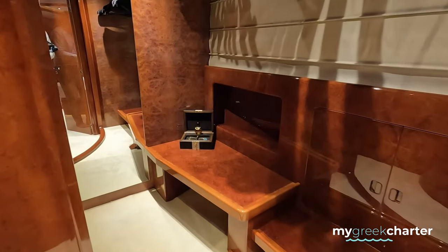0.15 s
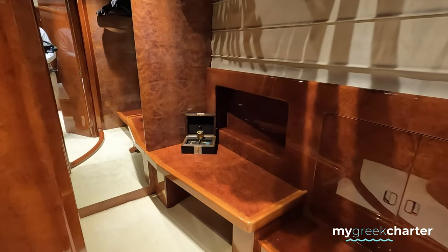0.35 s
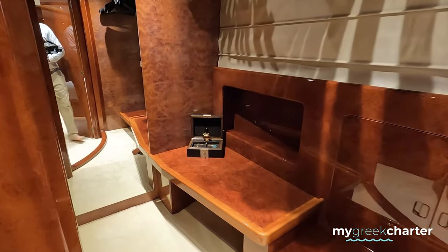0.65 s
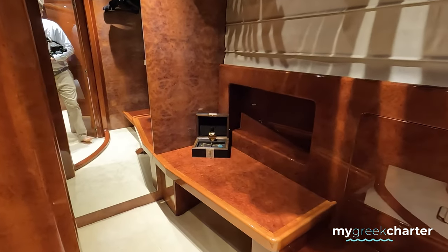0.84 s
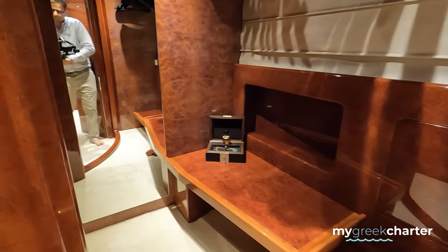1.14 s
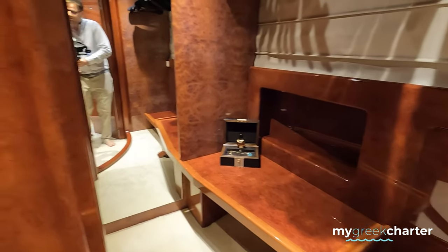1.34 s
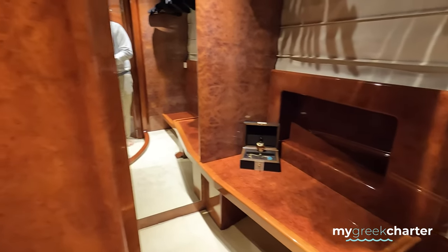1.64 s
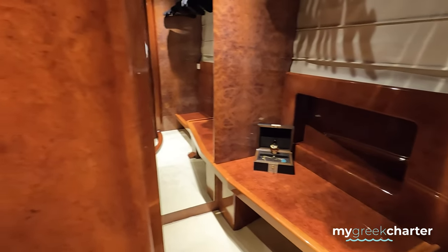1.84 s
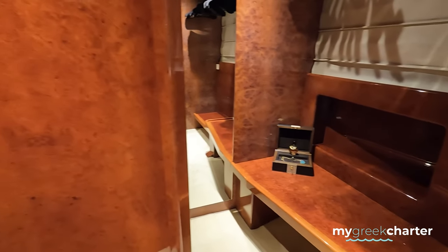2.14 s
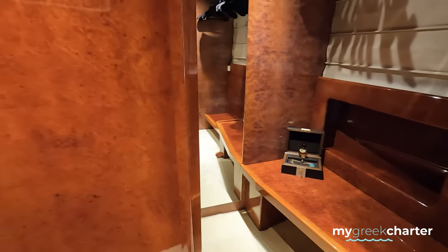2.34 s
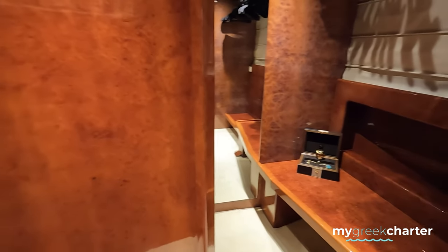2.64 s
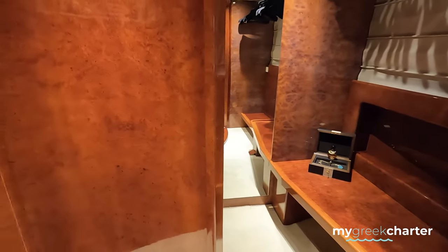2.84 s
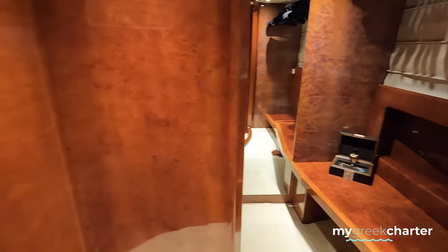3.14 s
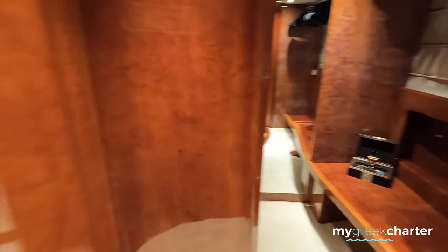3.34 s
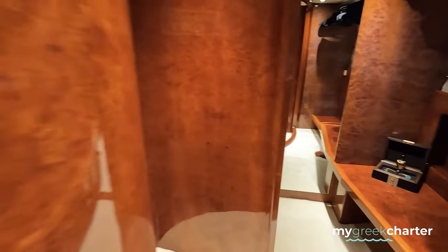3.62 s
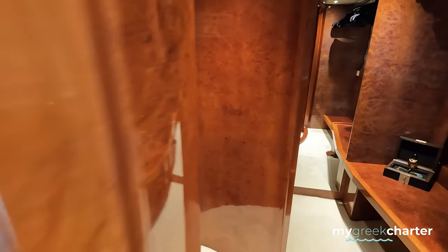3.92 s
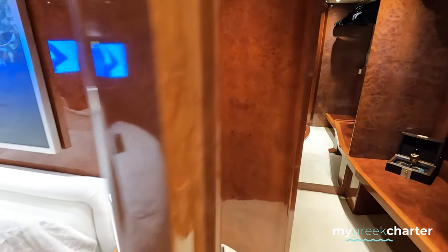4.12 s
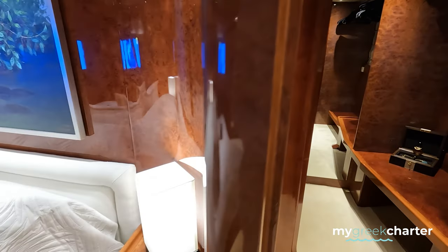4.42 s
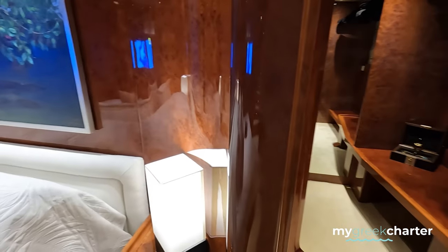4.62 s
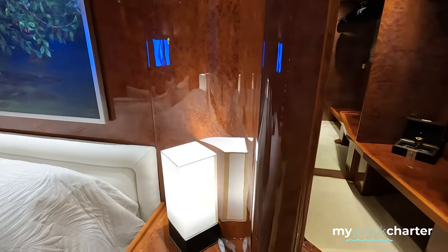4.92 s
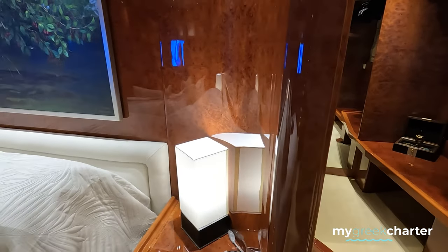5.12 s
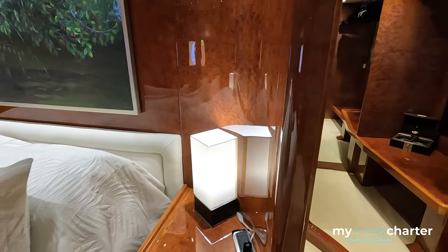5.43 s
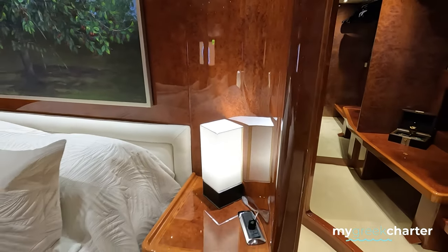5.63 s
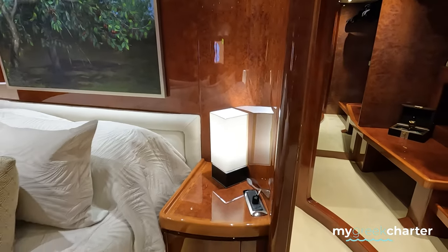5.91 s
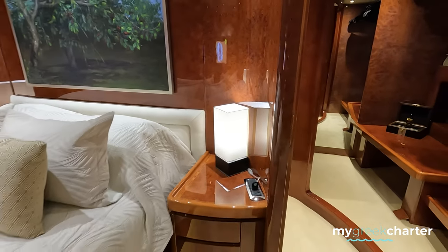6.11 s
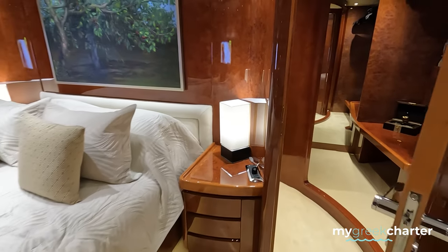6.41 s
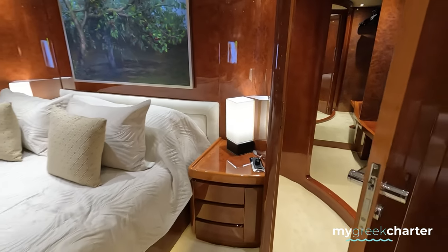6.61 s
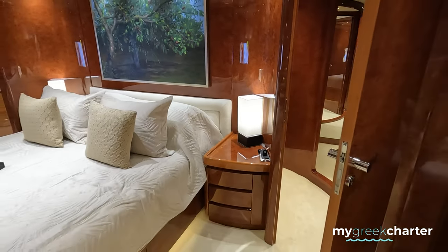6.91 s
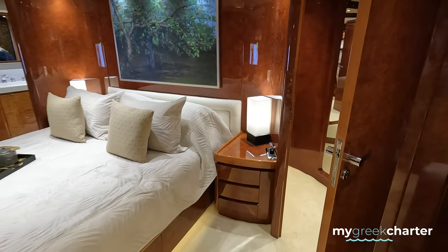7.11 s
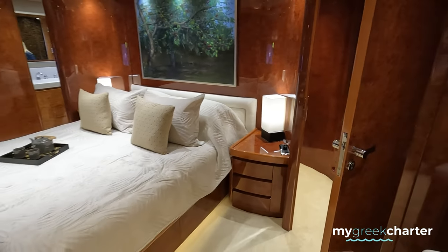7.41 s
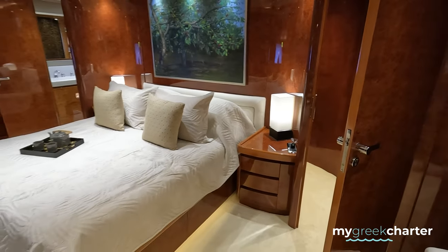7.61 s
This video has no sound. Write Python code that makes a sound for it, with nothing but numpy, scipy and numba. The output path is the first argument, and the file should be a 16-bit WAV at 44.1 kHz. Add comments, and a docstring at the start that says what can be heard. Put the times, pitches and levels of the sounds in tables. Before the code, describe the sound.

Inside a wood-panelled boat cabin, ventilation rushes and a motor hums low while clothes and feet swish softly on carpet. A metal fitting clicks with a light knock on a panel. Later a latch clicks twice in quick succession, each time with a wooden knock. A few lighter knocks follow, then a door bangs shut, ringing the panels. It is all heard close up on a phone carried by someone walking.

```python
"""Inside a wood-panelled boat cabin, heard close up on a phone carried by someone walking about.
From the start ventilation rushes and a motor hums, while cloth and feet swish on carpet. At 1.4 s a
fitting clicks and a panel knocks; near 4.1 s a latch clicks twice, each time with a knock of wood.
After a few lighter knocks a door bangs shut at 6.7 s, ringing the panels, and the phone turns its
gain down."""
import sys
import numpy as np
from scipy import signal
from scipy.fft import rfft, irfft, next_fast_len
from scipy.io import wavfile
from scipy.ndimage import uniform_filter1d
from numba import njit

SR = 44100
rng = np.random.default_rng(int(sys.argv[2]) if len(sys.argv) > 2 else 0)


def output_pcm(signal):
    """Save a mono or channel-first signal as 16-bit PCM at the path in sys.argv[1].

    Samples are clipped to [-1, 1] before scaling.
    """
    pcm = np.clip(np.atleast_2d(signal).T, -1, 1) * 32767
    wavfile.write(sys.argv[1], SR, np.round(pcm).astype(np.int16))


N = 342083
T = np.arange(N) / SR
BANDS_HZ = 500 * 2 ** np.arange(0, 5, .5)  # half-octave noise bands for swishes and clicks


def undb(db):
    """Decibels to gain."""
    return 10 ** (np.asarray(db) / 20)


def unit(x):
    """Scaled to rms 1."""
    return x / np.sqrt(np.mean(x ** 2))


def fader(points):
    """Gain over time through (s, dB) points."""
    return undb(np.interp(T, *np.transpose(points)))


def colour(x, points):
    """Filter by (Hz, dB) points joined on a log axis."""
    size = next_fast_len(len(x))
    hz, db = np.transpose(points)
    f = np.arange(size // 2 + 1) * SR / size + 1
    return irfft(rfft(x, size) * undb(np.interp(np.log(f), np.log(hz), db)), size)[:len(x)]


def noise_band(hz, width_hz):
    """Noise passed twice through one resonance, rms 1."""
    b, a = signal.iirpeak(hz, hz / width_hz, SR)
    return unit(signal.lfilter(b, a, signal.lfilter(b, a, rng.standard_normal(N))))


def waver(rate_hz):
    """Random levels held 1 / rate_hz seconds and smoothed twice."""
    hold = int(SR / rate_hz)
    steps = np.repeat(rng.standard_normal(N // hold + 1), hold)
    return uniform_filter1d(uniform_filter1d(steps, hold), hold)[:N]


def bell(hz, centre_hz, octaves):
    """Gain that falls away from a centre on a log axis."""
    return np.exp(-.5 * (np.log2(hz / centre_hz) / octaves) ** 2)


@njit
def follow(x, attack, release):
    """Envelope that rises fast and falls slowly."""
    level, envelope = 0., np.empty(len(x))
    for i in range(len(x)):
        level += (abs(x[i]) - level) * (attack if abs(x[i]) > level else release)
        envelope[i] = level
    return envelope


# The motor's tones. Each row: frequency in Hz, relative level in dB.
MOTOR_TONES = [(27, -11.5), (53.8, -2.5), (78, -18), (102.3, -2.5)]
# The hum fades as the walker leaves the passage. Each row: time in seconds, level in dB.
MOTOR_LEVEL = [(0, -60.5), (2.1, -64), (2.36, -55.5), (2.75, -62), (3.8, -61.5), (4.05, -66), (5.9, -68.5),
               (7.76, -60.5)]


def motor_hum():
    """A motor in the background: low tones of steady pitch, each wavering in level."""
    hum = np.zeros(N)
    for hz, db in MOTOR_TONES:
        amplitude = np.sqrt(2) * undb(db + 0.98 * waver(rate_hz=3))
        hum += amplitude * np.sin(2 * np.pi * (hz * T + rng.random()))
    return hum * fader(MOTOR_LEVEL)


# Moving air in the cabin. Each row: frequency in Hz, relative spectral density in dB.
AIR_SPECTRUM = [(18, -42), (30, -33.5), (93, -9.5), (130, -13), (207, 0.5), (269, -10), (304, -6.5),
                (389, -2), (427, -7), (506, -4), (791, -12.5), (1200, -47), (1560, -52), (2640, -120)]
# Resonances of the ducts. Each row: frequency in Hz, width in Hz, relative level in dB.
DUCT_RESONANCES = [(205.4, 10.4, -1), (215, 54, -10), (299.9, 21, 4.5), (394.4, 12.7, -3.5), (556, 100, -6),
                   (657, 37, -9.5)]
# The rush is louder with the phone near a vent. Each row: time in seconds, level in dB.
VENT_LEVEL = [(0, -48), (.22, -44), (.6, -48.5), (.74, -43), (.9, -48), (1.7, -47.5), (2.1, -47.5),
              (2.36, -44.5), (2.75, -46.5), (3.7, -46), (3.95, -44), (4.4, -45.5), (5.12, -43.5),
              (5.32, -45), (5.55, -44.5), (6.2, -44.5), (7, -46.5), (7.76, -42.5)]


def ventilation():
    """A broad rush of air, with wavering duct resonances a little below it in level."""
    ducts = sum(undb(db + 0.84 * waver(rate_hz=4.13)) * noise_band(hz, width_hz)
                for hz, width_hz, db in DUCT_RESONANCES)
    air = unit(colour(rng.standard_normal(N), AIR_SPECTRUM)) * undb(0.31 * waver(rate_hz=4.4))
    return unit(air + undb(-3.5) * unit(ducts)) * fader(VENT_LEVEL)


# Steady rustle of clothes, close to the phone. Each row: time in seconds, strongest band's level in dB.
RUSTLE_LEVEL = [(0, -58.5), (.8, -63), (1.35, -58.5), (1.7, -65), (2.4, -62.5), (3.75, -60.5), (4.4, -61),
                (4.7, -60), (5.9, -61.5), (7.76, -58.5)]
# Soles and sleeves brushing. Each row: time of the peak in seconds, band level at the centre in dB,
# centre in Hz, fall time in ms.
BRUSH_STROKES = [(.15, -56, 3000, 21), (.237, -48.5, 1740, 43), (.41, -58, 1770, 83), (.498, -55, 1970, 26),
                 (0.749, -52.5, 1670, 47), (.95, -80, 6000, 39), (1.22, -60, 7000, 95),
                 (1.328, -54.5, 1720, 31), (1.44, -45.5, 2010, 38), (1.573, -58, 3400, 26),
                 (2.13, -57, 1490, 52), (2.351, -57, 1760, 59), (2.883, -54.5, 1840, 57),
                 (3.19, -56.5, 2200, 85), (3.495, -49, 1500, 57), (3.597, -46.5, 1980, 46),
                 (3.875, -48.5, 1980, 26), (4.26, -52, 1500, 27), (4.527, -52.5, 1800, 40),
                 (4.98, -50.5, 2030, 50), (5.43, -60.5, 4100, 77), (5.723, -49, 1700, 49),
                 (6.139, -54, 2090, 27), (6.28, -56, 2480, 20), (6.371, -49, 1840, 32),
                 (6.742, -44, 2980, 21), (6.95, -48, 2220, 51), (7.24, -59, 4100, 40)]


def swishes(bands):
    """Rubbing fibres: a steady rustle, and strokes that swell and stop, each with its own colour."""
    rustle = fader(RUSTLE_LEVEL)
    out = np.zeros(N)
    for hz, noise in zip(BANDS_HZ, bands):
        power = (bell(hz, centre_hz=2000, octaves=2.19) * rustle) ** 2
        for peak_s, peak_db, centre_hz, fall_ms in BRUSH_STROKES:
            near = slice(max(int((peak_s - .4) * SR), 0), int((peak_s + .4) * SR))
            ms = 1000 * (T[near] - peak_s)
            width_ms = fall_ms * np.where(ms < 0, 0.91, 1)  # rises a little faster than it falls
            stroke = np.exp(-(ms / width_ms) ** 2)
            power[near] += stroke * (bell(hz, centre_hz, octaves=0.96) * undb(peak_db)) ** 2
        out += noise * np.sqrt(power) * undb(2.0 * waver(rate_hz=25))
    return out


# Clicks of the latch and fittings. Each row: time in seconds, band level at the centre in dB,
# centre in Hz, width in octaves, echo relative to the click in dB.
METAL_CLICKS = [(1.385, -41.5, 5050, 1.54, -2.5), (1.393, -47.5, 5000, 1.5, -6),
                (2.345, -55, 1500, 1.2, -8), (2.672, -58, 2470, .8, 7), (2.872, -55, 1800, 1.3, -7),
                (4.07, -35, 2300, 1.35, -0.5), (4.164, -32.5, 2070, 1.08, -3.5),
                (5.036, -53, 4000, 1.9, -7), (5.215, -54.5, 1640, .92, -20), (6.721, -46, 2580, 4.1, 4.5),
                (6.774, -47.5, 2600, 1.3, 5.5), (7.433, -51, 2400, 1.3, -9), (7.6182, -51, 1300, 1.3, -6)]
# Resonances of the fittings. Each row: frequency in Hz, width in Hz, gain in dB.
FITTING_RESONANCES = [(838, 140, 4), (1490, 390, -7), (2130, 410, -4.5), (2650, 110, -0.5), (3540, 190, -7),
                      (5300, 340, -9.5)]
CLICK_MS, ECHO_T60_S = 7.6, 0.25  # the echo's decay time holds at 2 kHz


def latch_clicks(bands):
    """A short metal rattle, then the cabin's echo, which fades sooner in the treble; fittings ring."""
    out = np.zeros(N)
    for time_s, peak_db, centre_hz, octaves, echo_db in METAL_CLICKS:
        start = int((time_s - .001) * SR)
        t = T[:min(SR // 2, N - start)]
        span = slice(start, start + len(t))
        for hz, noise in zip(BANDS_HZ, bands):
            rise_s = 0.002 * max(hz / 3000, 1)
            rattle = np.exp(-(1000 * t / CLICK_MS) ** 2) * np.minimum(t / rise_s, 1)
            decay_db = 60 * t / ECHO_T60_S * (hz / 2000) ** 0.12
            echo = undb(echo_db - decay_db) * np.minimum(t / 0.013, 1)
            out[span] += noise[span] * (rattle + echo) * bell(hz, centre_hz, octaves) * undb(peak_db)
    ringing = sum(undb(db) * signal.lfilter(*signal.iirpeak(hz, hz / width_hz, SR), out)
                  for hz, width_hz, db in FITTING_RESONANCES)
    return out + ringing


# Modes of the panelling. Each row: frequency in Hz, relative level in dB, seconds to fall 60 dB at
# a damping factor of 1.
PANEL_MODES = [(58, -19, 0.31), (86, 2.5, 0.24), (97.3, -19, 0.33), (113.9, 6.5, 0.36),
               (138.4, -17.5, 0.38), (146, -1, 0.31), (169.3, -1, 0.45), (197.7, 3.5, 0.23),
               (205, -10, 0.65), (223.4, -4.5, 0.15), (259.8, -1.5, 0.62), (302.6, 3, 0.43), (315, 1, 0.39),
               (339, -8.5, 0.59), (386, -11.5, 0.29), (421, -5, 0.1), (433, -20.5, 0.36),
               (506.6, -7.5, 0.44), (551, -2, 0.77), (628.4, -1, 0.4), (725, -15, 0.59), (685, -1, 0.32),
               (832, 2, 0.079), (945, -30, .25), (1080, 10, 0.12)]
# Small panels push little deep bass into the air. Each row: frequency in Hz, gain in dB.
PANEL_RADIATION = [(20, -29), (60, -3.5), (100, 1.5), (20000, -5.5)]
# Blows on wood around the cabin; the cluster from 6.7 s is the door. Each row: start in seconds, level
# in dB, centre of the modes reached in Hz, reach in octaves, damping factor, free ringing time in ms.
WOOD_BLOWS = [(.655, -52, 543, 0.38, 1.9, 150), (1.428, -39, 95, .4, 2.3, 150),
              (1.437, -29.5, 380, 0.86, 2.16, 150), (2.329, -54, 89, 0.21, 0.73, 250),
              (3.438, -37, 330, 0.15, 2.3, 150), (4.0744, -20.5, 306, 0.52, 2.04, 140),
              (4.1661, -17.5, 300, 0.51, 2.28, 150), (4.509, -35, 112, 1, 3.3, 150),
              (5.138, -44.5, 195, 0.29, 0.51, 140), (5.219, -30.5, 267, 0.52, 3.3, 38),
              (5.855, -37, 121, .6, 6.8, 150), (6.279, -43.5, 147, .32, 1.8, 150),
              (6.716, -16, 247, 0.35, 0.42, 58), (6.7605, -11.5, 505, 0.43, 2.1, 180),
              (6.762, -6, 96, 0.76, 1.5, 250), (6.764, -6.5, 292, 0.41, 1.12, 160),
              (6.815, -19, 354, 0.61, 2.2, 97), (6.855, -20.5, 280, 0.62, 1.57, 74),
              (7.432, -41.5, 303, 1, 1.6, 130)]
PUSH_CYCLES, STOP_MS = 0.78, 23  # time constants: the blow builds up, the panel is stilled
THUMP_DB, THUMP_CYCLES = 6, 0.95
BUZZ_DB, BUZZ_T60_S = -1.5, 0.37  # decay time at a damping factor of 1


def panels_and_door():
    """Each blow pushes briefly and rings the modes near its centre until frame or hand stills the wood."""
    out = np.zeros(N)
    hz, db, t60_s = np.transpose(PANEL_MODES)[:, :, None]
    sign = (-1.) ** np.arange(len(hz))[:, None]  # neighbouring modes move the struck spot opposite ways
    t = T[:SR // 2]
    bins_hz = 2 * np.arange(len(t) // 2 + 1) + 1
    scatter = rng.standard_normal((len(WOOD_BLOWS), len(hz), 2))
    for (start_s, level_db, centre_hz, octaves, damping, free_ms), chance in zip(WOOD_BLOWS, scatter):
        share = undb(db + 1.7 * chance[:, :1]) * bell(hz, centre_hz, octaves)
        detune = 1 + 0.002 * chance[:, 1:]
        modes = sign * np.sin(2 * np.pi * hz * detune * t) * share * undb(-60 * damping * t / t60_s)
        ring = np.sqrt(2 / np.sum(share ** 2)) * modes.sum(axis=0)
        # loose panels buzz against their frames: noise around the same pitch
        spectrum = rfft(rng.standard_normal(len(t))) * bell(bins_hz, centre_hz, 1.26 * octaves)
        buzz = unit(irfft(spectrum, len(t))) * undb(BUZZ_DB - 60 * damping * t / BUZZ_T60_S)
        # the contact itself: a cycle or two at the onset
        cycles = centre_hz * t
        thump = undb(THUMP_DB) * np.sin(2 * np.pi * cycles) * np.exp(-(cycles / THUMP_CYCLES) ** 2)
        push = 1 - np.exp(-cycles / PUSH_CYCLES)  # a softer blow pushes longer and reaches lower modes
        stilled = np.exp(-np.maximum(1000 * t - free_ms, 0) / STOP_MS)
        knock = undb(level_db) * push * stilled * (ring + buzz + thump)
        start = int(start_s * SR)
        out[start:start + len(t)] += knock[:N - start]
    return colour(out, PANEL_RADIATION)


def scene():
    """The cabin as it reaches the phone, one channel."""
    rubbed = [noise_band(hz, 0.68 * hz) for hz in BANDS_HZ]
    struck = [noise_band(hz, 0.68 * hz) for hz in BANDS_HZ]
    background = ventilation() + motor_hum()
    return (background + swishes(rubbed) + panels_and_door() + latch_clicks(struck))[None]


# The phone microphone's response. Each row: frequency in Hz, gain in dB.
PHONE_RESPONSE = [(30, 3), (3000, 0), (5000, -3.5), (7000, -7.5), (8600, -16), (9600, -16.5), (12000, -9.5),
                  (12600, -18), (13300, -30)]
# A narrow dead band near 9 kHz. Each row: frequency in Hz, gain in dB.
PHONE_NOTCH = [(8800, 0), (8950, -15), (9150, -15), (9400, 0)]
AGC_THRESHOLD_DB, AGC_RATIO, AGC_ATTACK_S, AGC_RELEASE_S = -33.5, 1.526, 0.12, 1
CEILING, TOP_HZ = 0.97, 13300


def record(dry):
    """The phone: microphone colour, gain control that lags loud sounds, rounded peaks, steep top cut."""
    x = colour(colour(dry[0], PHONE_RESPONSE), PHONE_NOTCH)
    envelope = follow(x, 1 / (AGC_ATTACK_S * SR), 1 / (AGC_RELEASE_S * SR))
    x = x * np.minimum(1, undb(AGC_THRESHOLD_DB) / (envelope + 1e-9)) ** (1 - 1 / AGC_RATIO)
    rounded = x / (1 + (x / CEILING) ** 4) ** .25
    top_cut = signal.ellip(10, .2, 80, TOP_HZ, fs=SR, output="sos")
    return signal.sosfilt(top_cut, rounded)[None]


dry = scene()
out = record(dry)
output_pcm(out)
```